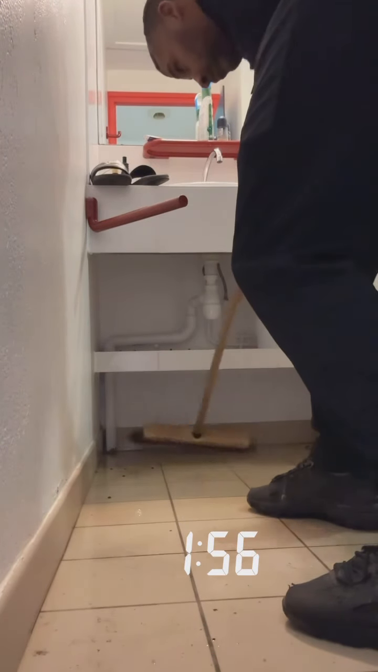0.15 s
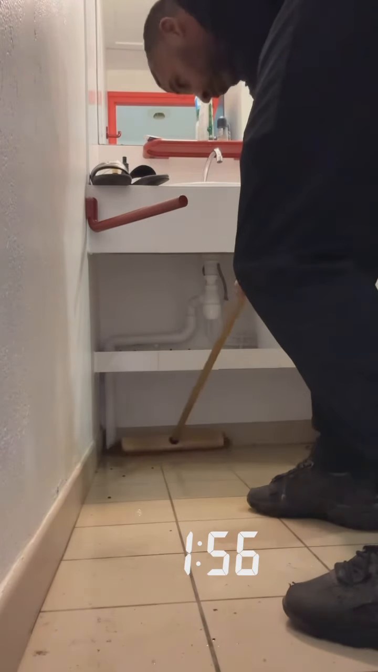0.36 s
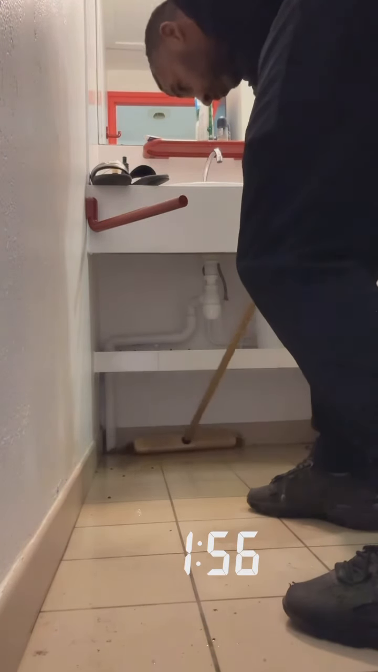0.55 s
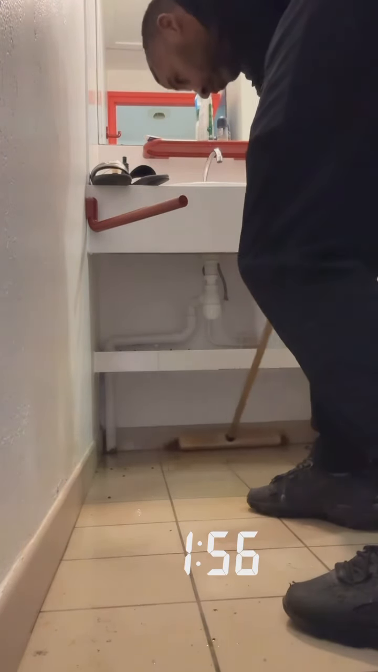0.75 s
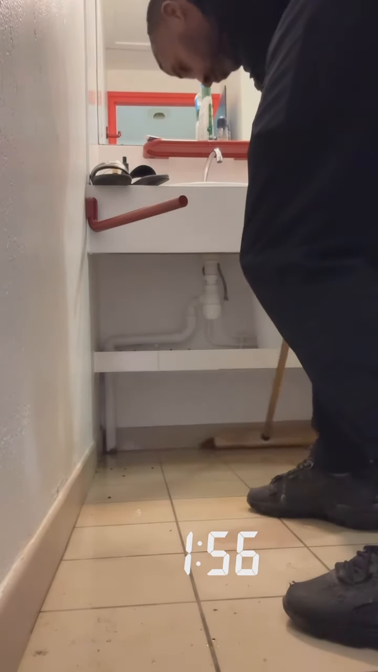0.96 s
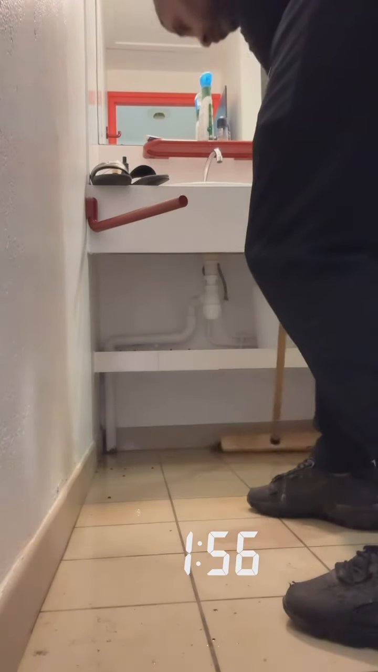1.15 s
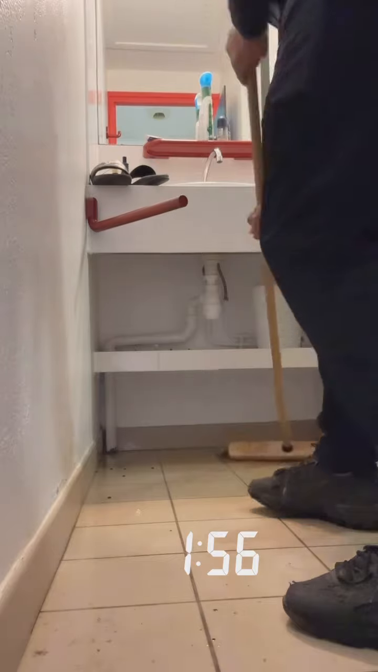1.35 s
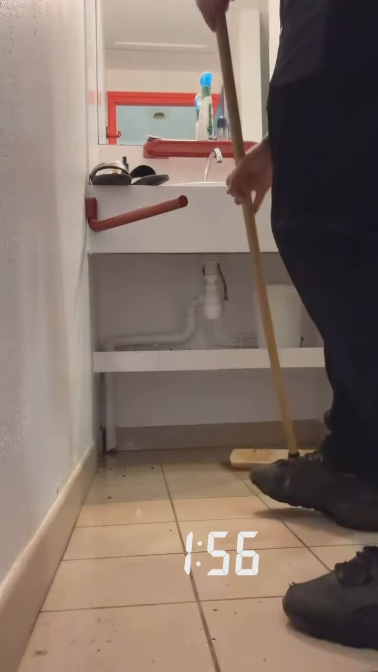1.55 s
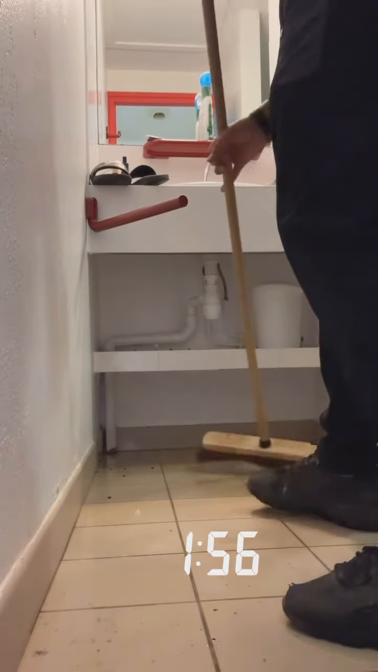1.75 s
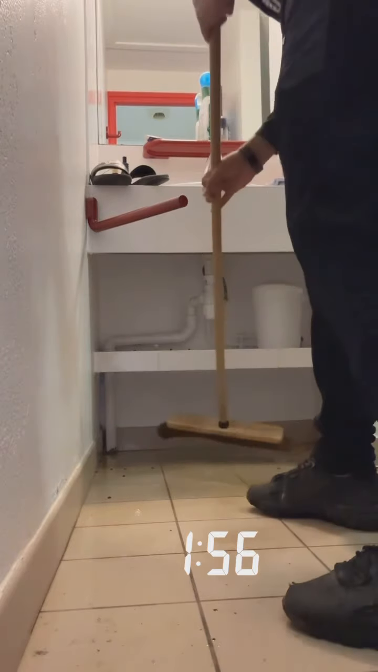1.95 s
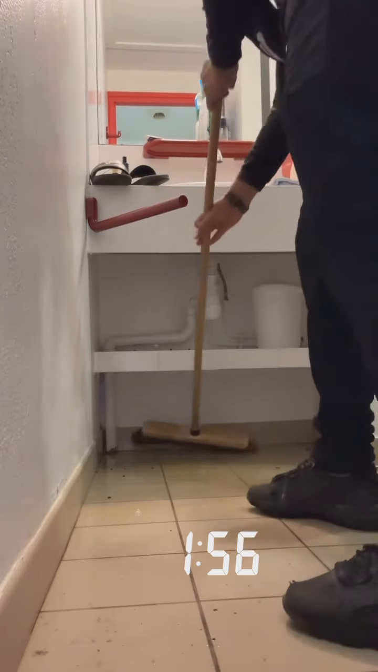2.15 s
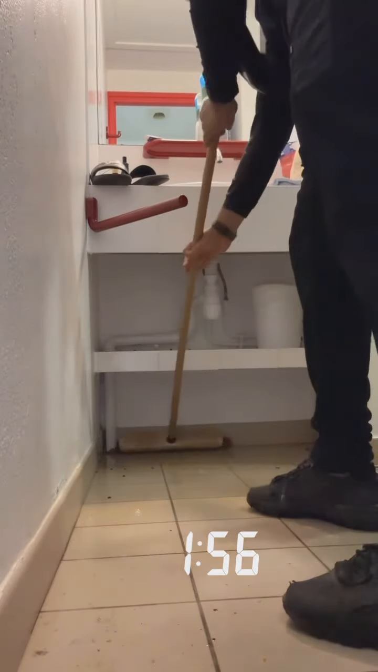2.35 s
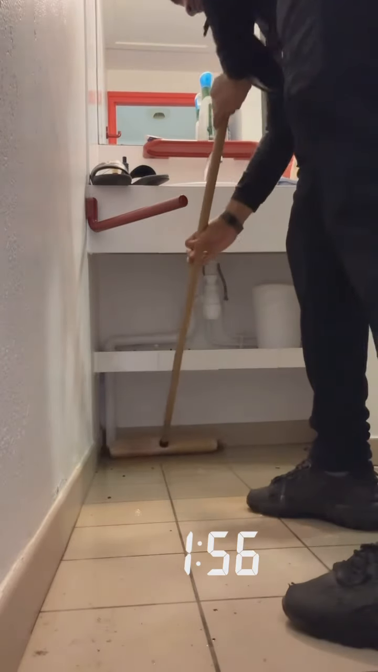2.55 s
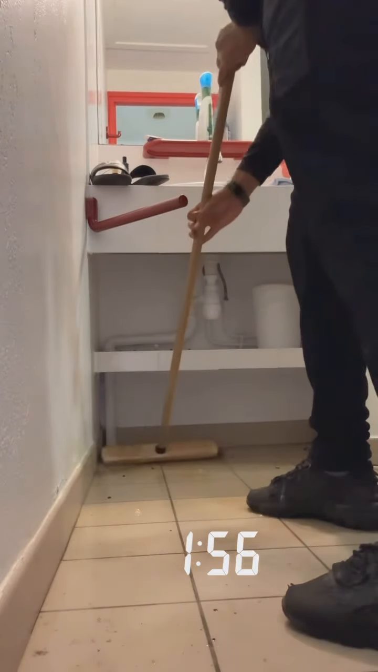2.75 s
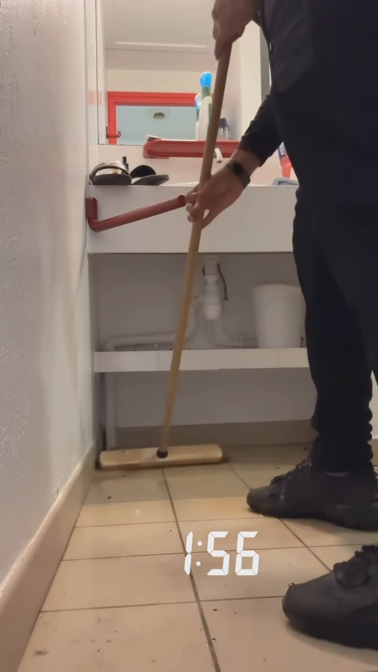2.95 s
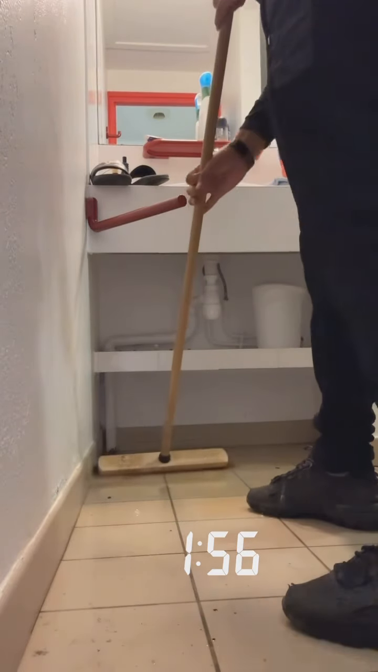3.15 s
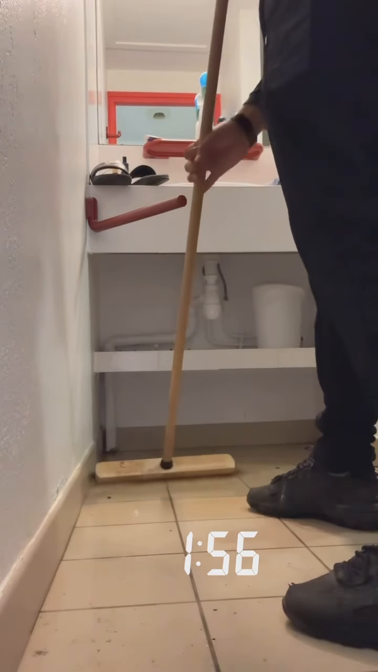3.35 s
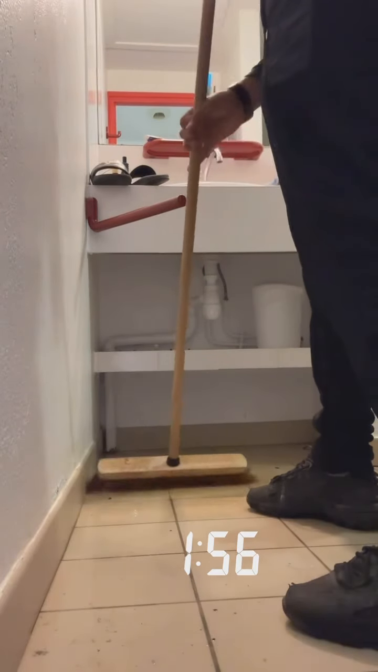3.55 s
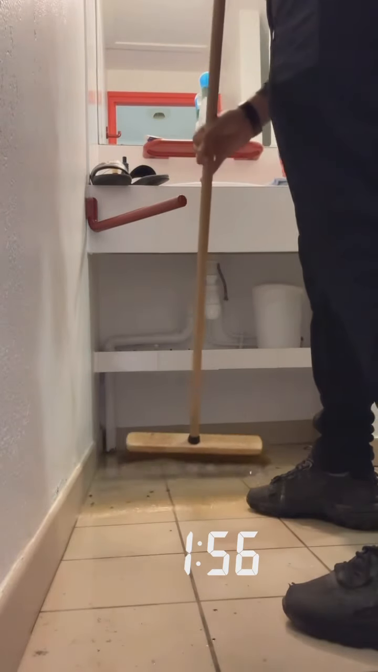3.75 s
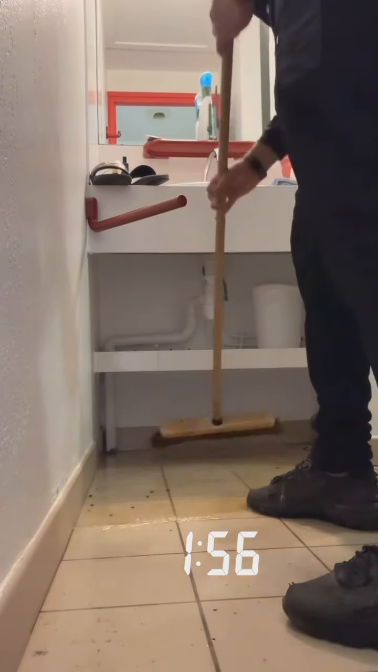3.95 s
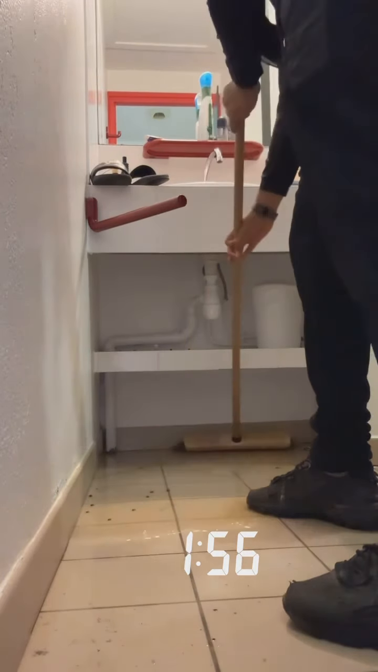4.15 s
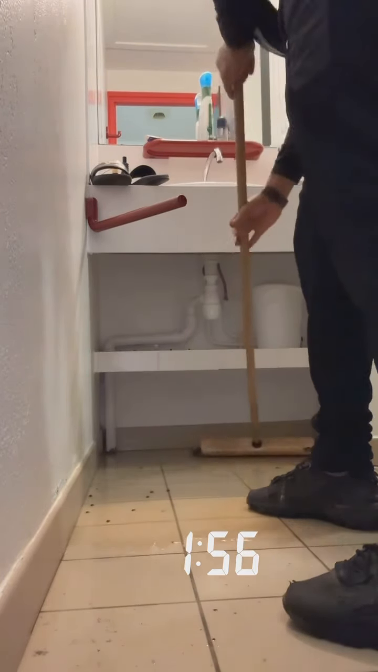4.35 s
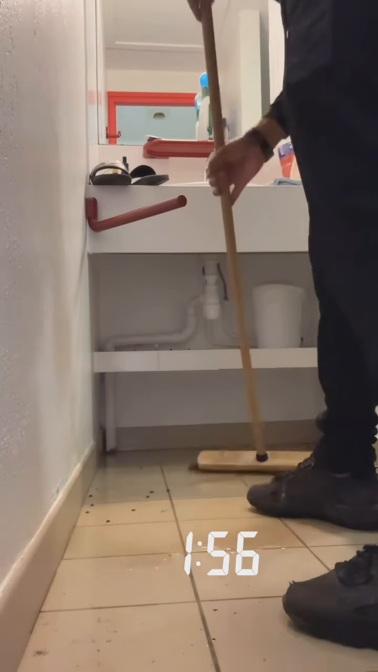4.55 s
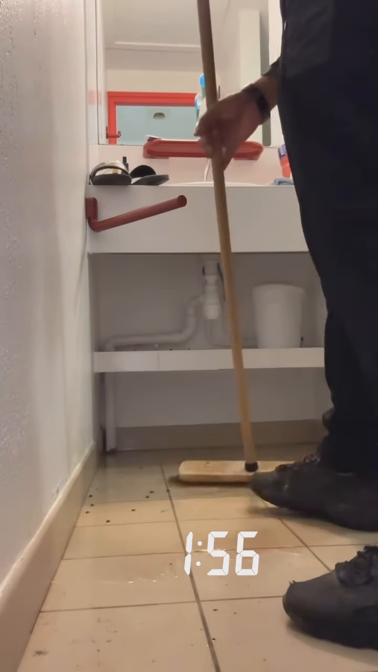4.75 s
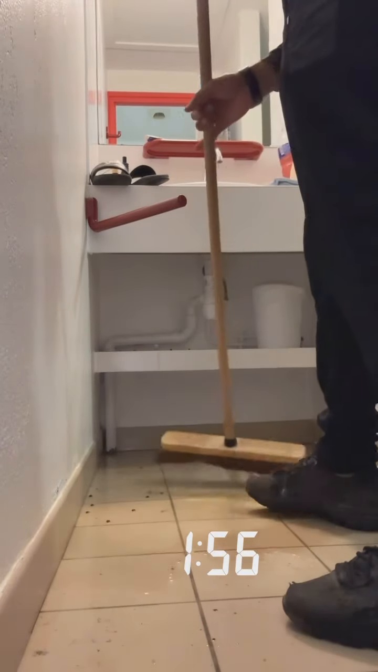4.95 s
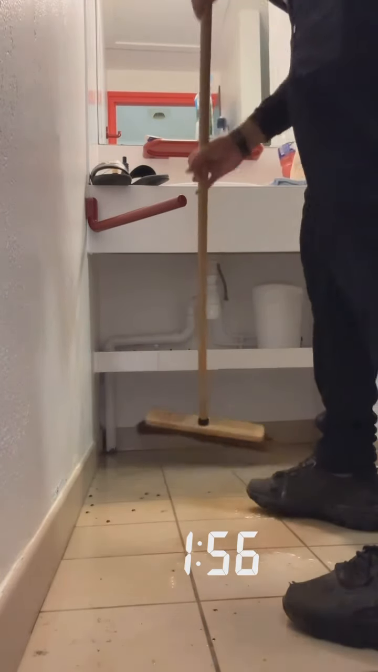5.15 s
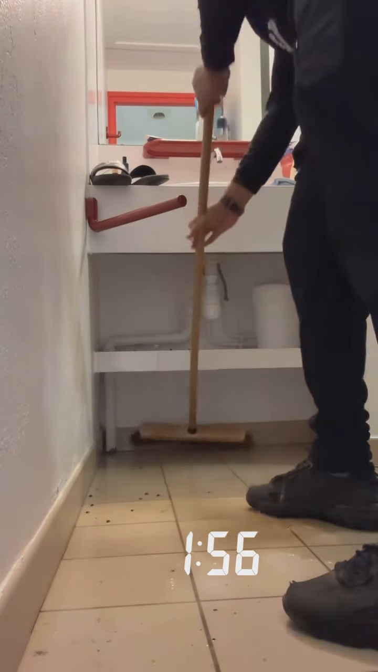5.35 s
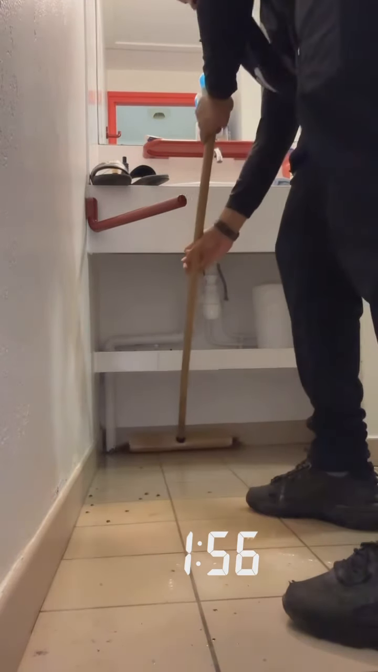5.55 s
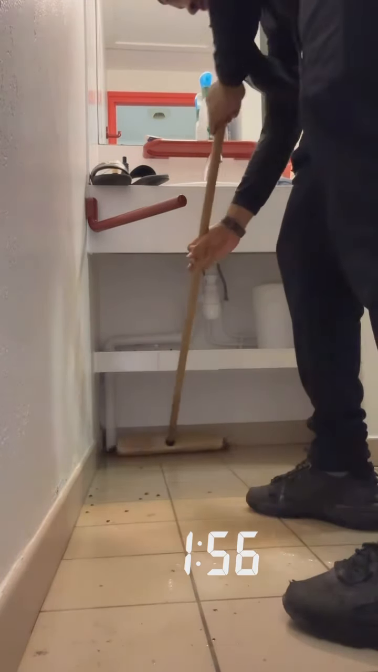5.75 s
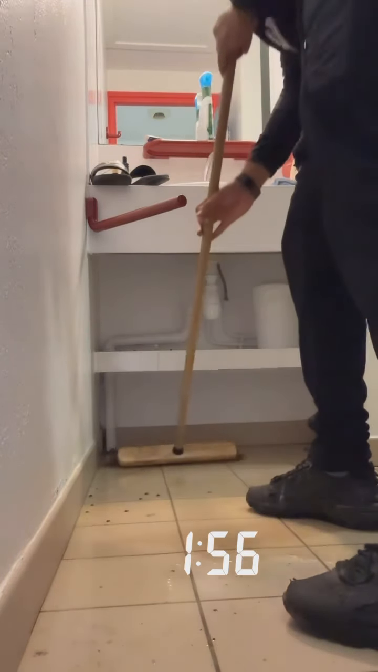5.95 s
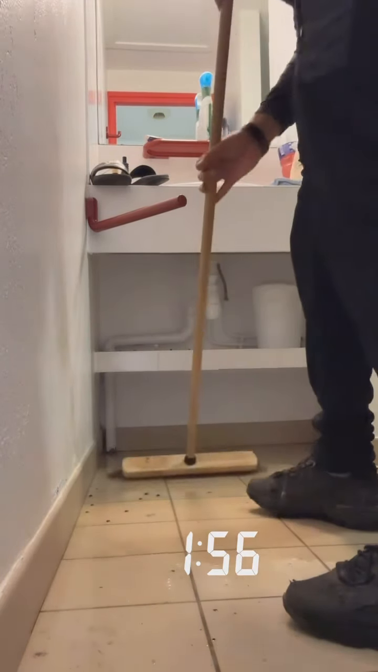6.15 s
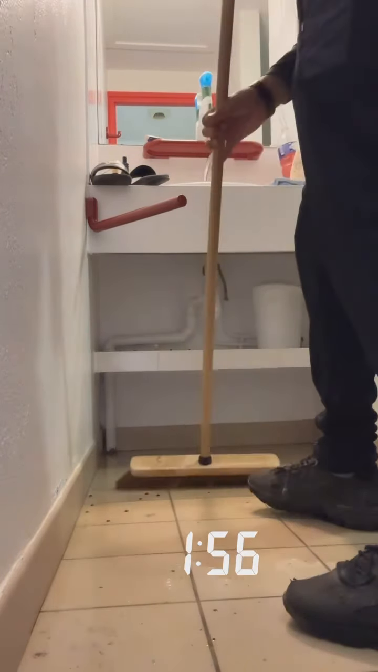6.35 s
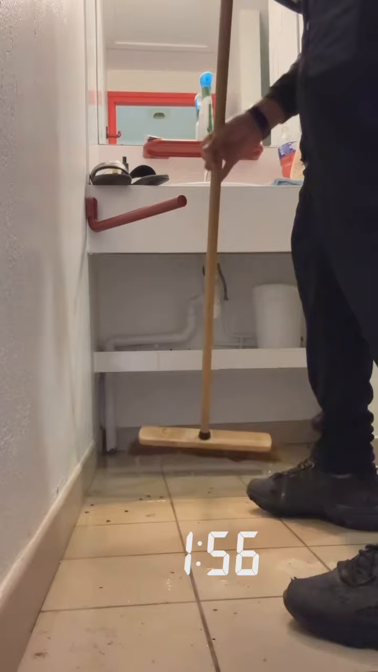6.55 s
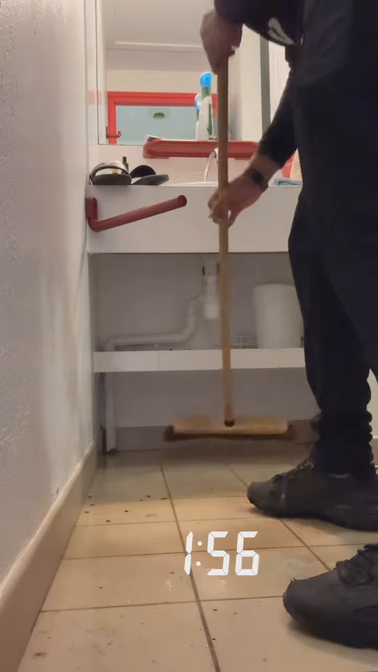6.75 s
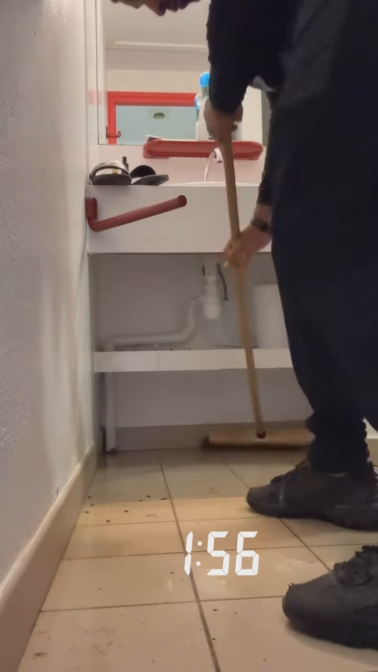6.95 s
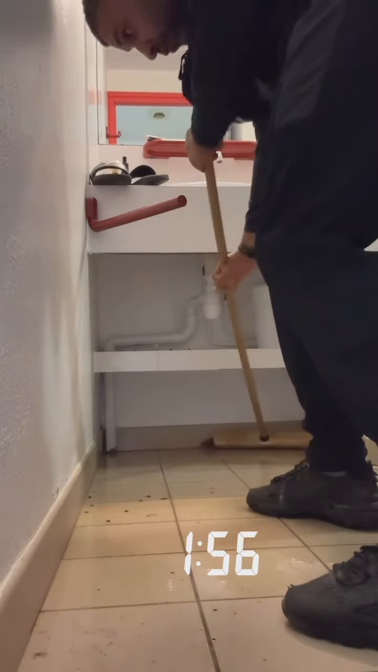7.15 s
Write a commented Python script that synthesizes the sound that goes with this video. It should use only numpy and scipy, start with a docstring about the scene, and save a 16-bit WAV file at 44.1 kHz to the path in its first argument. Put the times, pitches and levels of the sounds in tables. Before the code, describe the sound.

Close up in a small, hard-walled tiled bathroom, a wooden push broom sweeps damp grit in uneven scratchy passes, each swelling and fading. Near one second the head clatters hard; another sharp knock comes around four and a half seconds, after a cluster of bristle slaps and a brief low groan. Later strokes alternate strong and light. Soft ventilation air and a wavering low hum stay underneath.

```python
"""In a small tiled bathroom, a wooden push broom is drawn over a damp, gritty floor.
Bristles slap down in bursts of tiny clicks, then hiss, rasp and shudder as they slip over the grit.
The wooden head knocks hard twice; dull thumps, bristle squeaks and a short sinking groan join in.
Each pass swells and fades with the speed of the broom, and the walls ring after every broom sound.
A soft rush of ventilation air and a wavering hum lie underneath; both channels are the same."""
import sys
import numpy as np
from scipy import signal
from scipy.fft import rfft, irfft
from scipy.io import wavfile
from scipy.ndimage import uniform_filter1d

SR = 44100
rng = np.random.default_rng(int(sys.argv[2]) if len(sys.argv) > 2 else 0)


def wrap_up_sound(samples):
    """Save the sound to the file named by the first command line argument, as 16-bit audio."""
    columns = np.atleast_2d(samples).T
    # keep every value between -1 and 1, then stretch to whole-number steps
    tamed = np.clip(columns, -1, 1)
    steps = np.round(tamed * 32767).astype(np.int16)
    wavfile.write(sys.argv[1], SR, steps)


N = 317961  # length in samples
HZ = np.fft.rfftfreq(4096, 1 / SR)  # frequencies at which every colour is worked out


def amp(db):
    """Turns decibels into a plain multiplier."""
    return 10 ** (np.asarray(db) / 20)


def evened(x):
    """Scales a sound to an rms of 1."""
    return x / np.sqrt(np.mean(x ** 2) + 1e-20)


def read(points, hz):
    """Reads a curve joined by straight lines on a log-frequency axis."""
    point_hz, value = np.transpose(points)
    return np.interp(np.log(hz + 1), np.log(point_hz), value)


def add(mix, start_s, sound):
    """Adds a sound to the mix at its start time, cut off at the end of the mix."""
    part = mix[round(start_s * SR):][:len(sound)]
    part += sound[:len(part)]


def causal_response(log_gain):
    """Finds the response with this gain that never sounds before its cause."""
    mirrored = np.r_[log_gain, log_gain[-2:0:-1]]
    return np.exp(np.conj(signal.hilbert(mirrored)))[:len(log_gain)]


def colour(x, gain):
    """Filters a sound with the given gain at the frequencies HZ."""
    ring = irfft(causal_response(np.log(np.maximum(gain, 1e-5))))
    return signal.oaconvolve(x, ring)[:len(x)]


def balanced(x, span_hz):
    """Gives a random burst equal energy in every band of this width, keeping its finer ripple."""
    spectrum = rfft(x, 2 * len(x))
    bins = max(3, int(span_hz * 2 * len(x) / SR))
    power = uniform_filter1d(abs(spectrum) ** 2, bins)
    log_gain = -0.5 * np.log(np.maximum(power, 0) + 1e-12)
    return irfft(spectrum * causal_response(log_gain))[:len(x)]


def drift(rate_hz):
    """Makes a random wandering of rms 1, with no changes faster than the given rate."""
    slow = np.fft.rfftfreq(N, 1 / SR) < rate_hz
    return evened(irfft(rfft(rng.standard_normal(N)) * slow, N))


def slips(per_s, spread_db):
    """Makes a random train of tiny clicks, a few far larger than the rest."""
    size = amp(spread_db * np.minimum(rng.exponential(1, N), 4))
    happens = rng.random(N) < per_s / SR
    return evened(size * rng.choice([-1, 1], N) * happens)


def resonance(ring_hz, boost_db, q):
    """Gives the gain of one peak (or dip, if negative) in a flat spectrum; higher q is narrower."""
    offset = 2 * q * (HZ - ring_hz) / ring_hz
    return np.sqrt(1 + (amp(boost_db) ** 2 - 1) / (1 + offset ** 2))


def contact(spread_s, gain, level_db, rise):
    """Two surfaces meet: a coloured cluster of small clicks builds up and dies away."""
    t = np.arange(8192) / SR
    shape = np.exp(-t / spread_s) * (1 - np.exp(-t / (rise * spread_s)))
    clicks = rng.uniform(-1.06, 1, len(t)) * (rng.random(len(t)) < 0.4)
    sound = colour(balanced(clicks * shape, span_hz=300), gain)
    # The level is the rms when all the energy is spread over a tenth of a second.
    return amp(level_db) * sound / (np.linalg.norm(sound) + 1e-12) * np.sqrt(SR / 10)


# Colour of the air noise: pitch_hz [Hz], relative_level_db [dB]
AIR_COLOUR = [(20, -13), (45, -8), (72, 3.5), (115, -2.5), (180, -0.5), (300, 0), (550, -5), (900, -5),
              (3000, -16.5), (6500, -19.5), (9500, -31), (15000, -32)]
# Hum level before its waver: time_s [s], level_db [dB]
HUM_LEVELS = [(0, -55), (.35, -56), (.68, -46.5), (.83, -66), (1.3, -54.5), (4.1, -54.5), (4.42, -44),
              (4.801, -56.5), (5.65, -60), (6.33, -49.5), (6.55, -62.5), (6.9, -51.5)]


def ventilation(air_db=-51.5, hum_hz=180, hum_waver_db=2):
    """Air rushes as soft coloured noise; the hum is one tone that wavers in pitch and level."""
    air = evened(colour(rng.standard_normal(N), amp(read(AIR_COLOUR, HZ))))
    turns = np.cumsum(hum_hz + 2.9 * drift(11.1)) / SR
    hum = evened(np.sin(2 * np.pi * turns))
    hum_db = np.interp(np.arange(N) / SR, *np.transpose(HUM_LEVELS)) + hum_waver_db * drift(10)
    return amp(air_db) * air + amp(hum_db) * hum


def swing(full_s, rise_s, hold_s, fall_s, fade_db=-9.5, arch=2.08):
    """The broom gathers speed, keeps it and slows; fade_db is reached after one rise or fall time."""
    t = np.arange(N) / SR - full_s
    away = np.maximum(-t / rise_s, 0) + np.maximum((t - hold_s) / fall_s, 0)
    return amp(fade_db * np.minimum(away, 10) ** arch)  # arch sets how rounded the swing is


# Colours of the hiss of bristle tips, the rasp of bent bristles, the shudder of the head, and
# the fizz of tiny bubbles bursting on damp tile: pitch_hz [Hz], relative_level_db [dB per Hz]
HISS_COLOUR = [(300, -26), (700, -20), (1300, -17), (2200, -5), (3100, 0.5), (5000, 1.5), (6600, 1),
               (7700, -5.5), (9200, -20), (10500, -28), (15000, -23.5)]
RASP_COLOUR = [(300, -26), (650, -17.5), (1000, -5.5), (1400, -4), (1900, 1), (2400, -2), (3200, -8.5),
               (6000, -44.5)]
SHUDDER_COLOUR = [(40, -35), (80, -13.5), (125, -4), (240, -7.5), (430, -1), (750, -5.5), (1100, -20),
                  (2500, -41)]
FIZZ_COLOUR = [(6000, -28), (9500, -11), (12000, 0), (15000, 0)]
# Passes of the broom, firm strokes and light returns; levels before uneven floor and room:
# full_speed_s [s], rise_s [s], hold_s [s], fall_s [s],
# hiss_db [dB], rasp_db [dB], shudder_db [dB], fizz_db [dB]
STROKES = [(0.0, .05, 0, 0.033, -38, -47.5, -54, -66), (0.133, .1, 0.025, 0.23, -39, -44, -52, -62),
           (0.566, 0.14, 0, 0.52, -34, -39.5, -74, -55), (1.244, 0.27, 0, 0.33, -33, -36.5, -47, -55.5),
           (1.84, 0.14, 0, 0.16, -46.5, -52, -59, -61), (2.19, 0.15, 0.066, 0.11, -41.5, -51.5, -73, -67),
           (2.442, 0.086, 0.13, 0.1, -36.5, -41, -49, -69),
           (2.697, 0.17, 0.48, 0.17, -42.5, -39.5, -65, -74),
           (3.253, .06, 0.12, 0.16, -44, -40.5, -43, -64), (3.702, 0.15, 0, 0.67, -46.5, -52, -58, -62),
           (4.24, 0.087, 0, 0.44, -32, -40.5, -56, -54), (5.116, 0.13, 0.45, .2, -48.5, -53, -79, -69),
           (5.785, .17, 0.085, 0.36, -33.5, -42, -52.5, -64), (6.526, 0.17, 1, 0.17, -49, -54, -57, -67),
           (7.19, 0.11, 0, .2, -45, -48, -52.5, -49.5)]


def sweeping(handling_db=-62.5):
    """Tips slip over grit and fizz on the damp; dragged bristles rasp and their stick-slip shakes the head."""
    swings = np.array([swing(*row[:4]) for row in STROKES])
    levels = amp(np.array(STROKES)[:, 4:].T)
    sliding, dragging, binding, wetness = np.sqrt(levels ** 2 @ swings ** 2)
    grip = amp(0.47 * drift(34))  # the tiles are unevenly rough
    puddles = amp(3.2 * drift(11))  # and unevenly damp
    hiss = evened(colour(slips(7000, spread_db=2.5), amp(read(HISS_COLOUR, HZ)))) * sliding
    rasp = evened(colour(slips(2500, spread_db=2.0), amp(read(RASP_COLOUR, HZ)))) * dragging
    fizz = evened(colour(slips(900, spread_db=3.5), amp(read(FIZZ_COLOUR, HZ)))) * wetness
    shaking = np.hypot(binding, amp(handling_db))  # a little remains while the broom is merely carried
    shudder = evened(colour(slips(500, spread_db=4.0), amp(read(SHUDDER_COLOUR, HZ)))) * shaking
    return grip * (hiss + rasp) + puddles * fizz + shudder


# Colour of a bristle slap, used for squeaks too: pitch_hz [Hz], relative_level_db [dB]
SLAP_COLOUR = [(200, -1.5), (1200, -1), (3000, 0.5), (6600, 1), (7800, -4.5), (9800, -22), (12000, -27),
               (15000, -23)]
# Bristles landing, levels before the room: start_s [s], level_db [dB], spread_s [s],
# lower_edge_hz [Hz], ring_hz [Hz], ring_boost_db [dB], top_fizz_db [dB]
SLAPS = [(0.1686, -31.5, 0.01, 2030, 3350, 7, 0), (2.09, -38.5, 0.0084, 2700, 2800, 8.5, 11),
         (2.241, -40.5, 0.015, 1400, 3100, 4, 7), (4.036, -43, 0.0094, 2500, 4500, 0, 11),
         (4.052, -33, 0.0059, 1300, 1700, 13, 10), (4.069, -26.5, 0.014, 845, 1220, 14.5, 7),
         (4.085, -28.5, 0.0053, 1200, 4100, 7.5, 8), (5.338, -41.5, .014, 3500, 6000, 12, 4),
         (5.352, -39.5, .004, 1400, 1740, 9, 11), (5.36, -31.5, .01, 1400, 1870, 9.5, 6),
         (5.388, -33.5, 0.011, 950, 1300, 10, -8), (6.525, -43.5, 0.022, 1800, 3940, 4, 7),
         (6.926, -31, 0.011, 2200, 4580, 7.5, 7), (6.958, -39, 0.014, 1000, 1270, 12.5, -3),
         (7.015, -38, .016, 2800, 4060, 9, 5)]


def slaps(body_db=-13, ring_q=13):
    """Many bristles land almost together; flat, wet landings reach lower, ring and fizz."""
    out = np.zeros(N)
    for start_s, level_db, spread_s, low_hz, ring_hz, boost_db, fizz_db in SLAPS:
        edge = 1 - (1 - amp(body_db)) / (1 + (HZ / low_hz) ** 6)  # body_db is what stays below the edge
        fizz = amp(fizz_db * np.clip((HZ - 8200) / 4000, 0, 1))
        gain = amp(read(SLAP_COLOUR, HZ)) * edge * fizz * resonance(ring_hz, boost_db, ring_q)
        add(out, start_s, contact(spread_s, gain, level_db, rise=0.92))
    return out


# Broad colour of the wooden head: pitch_hz [Hz], relative_level_db [dB]
WOOD_COLOUR = [(40, -13), (78, -18), (120, -17.5), (230, -2), (400, -6.5), (600, 0), (800, -1.5), (2000, 5),
               (3600, -1.5), (6000, 7), (7500, -2.5), (9500, -24), (15000, -37)]
# Ringing modes of head and handle: pitch_hz [Hz], width_hz [Hz], boost_db over the broad colour [dB]
WOOD_MODES = [(272, 11, 8.5), (460.4, 19, 11), (764, 22, 7.5), (1050, 67, 0), (1310, 400, 1.5),
              (1590, 70, 0), (1870, 38, 5), (2160, 24, -9), (2925, 86, 7.5), (4160, 76, 9.5)]
# Blows on the head, levels before the room: start_s [s], level_db [dB],
# hardness as upper_edge_hz [Hz], rattle_s [s], ring_hz [Hz], ring_boost_db [dB]
KNOCKS = [(0.9146, -19.5, 1950, 0.0022, 905, 10), (0.918, -24.5, 5030, 0.0018, 1600, 8.5),
          (0.926, -21, 2700, 0.0057, 2300, 7), (0.937, -17.5, 1960, 0.017, 1050, 7.5),
          (0.966, -26, 2000, 0.0082, 1710, 8), (0.982, -30.5, 900, 0.0066, 264, 15.5),
          (1.668, -38.5, 746, 0.028, 420, 7.5), (2.259, -41.5, 3000, .007, 600, 1),
          (3.215, -46.5, 686, 0.018, 332, 12), (3.31, -43, 694, 0.031, 270, 3),
          (3.466, -39.5, 650, 0.0077, 264, 15), (4.541, -41.5, 420, .011, 300, 9),
          (4.5725, -25, 4400, 0.00019, 3300, 16), (4.573, -28, 1230, 0.0093, 240, 10.5),
          (4.5813, -31.5, 3200, 0.0014, 2000, 9), (4.592, -30.5, 755, 0.011, 443, 15),
          (4.883, -43.5, 1090, .015, 540, 12), (5.372, -40.5, 1800, 0.0047, 500, 5),
          (6.246, -47.5, 647, .02, 390, 11), (6.388, -46, 1000, 0.018, 623, 4.5)]


def knocks(soft_db=-20):
    """The head strikes and rattles on its handle; harder contact reaches higher."""
    out = np.zeros(N)
    modes = [resonance(pitch_hz, db, pitch_hz / width_hz) for pitch_hz, width_hz, db in WOOD_MODES]
    body = amp(read(WOOD_COLOUR, HZ)) * np.prod(modes, axis=0)
    for start_s, level_db, hard_hz, rattle_s, ring_hz, boost_db in KNOCKS:
        edge = 1 / np.sqrt(1 + (HZ / hard_hz) ** 8)
        edge += amp(soft_db) * hard_hz / 2200  # grit adds a faint click
        gain = body * edge * resonance(ring_hz, boost_db, q=8.1)
        add(out, start_s, contact(rattle_s, gain, level_db, rise=0.65))
    return out


# Dull thumps through the floor, levels before the room: start_s [s], level_db [dB]
THUMPS = [(0.94, -45.5), (2.44, -56), (5.779, -51.5)]


def thumps(boom_hz=78.6, spread_s=0.004, q=2.5):
    """Weight comes down on the floor with a short, low boom."""
    out = np.zeros(N)
    ratio = HZ / boom_hz
    gain = ratio ** 2 / (1 + (2 * q * (ratio - 1)) ** 2) / (1 + (HZ / 160) ** 4)
    for start_s, level_db in THUMPS:
        add(out, start_s, contact(spread_s, gain, level_db, rise=0.29))
    return out


# Damp bristles flicking free, levels before the room: start_s [s], level_db [dB], pitch_hz [Hz]
SQUEAKS = [(1.773, -44, 6230), (3.745, -44.5, 5470), (3.815, -50, 4800), (4.813, -55, 4970)]


def squeaks(spread_s=0.017, ring_db=13, lower_edge_hz=4700):
    """A few bristles chatter around one high pitch as they leave the tile."""
    out = np.zeros(N)
    thin = amp(read(SLAP_COLOUR, HZ)) * (1 - 1 / (1 + (HZ / lower_edge_hz) ** 2))
    for start_s, level_db, pitch_hz in SQUEAKS:
        gain = thin * resonance(pitch_hz, ring_db, q=13)
        add(out, start_s, contact(spread_s, gain, level_db, rise=0.84))
    return out


# One stick-slip groan; pitch before its waver, level before the room:
# time_s [s], pitch_hz [Hz], level_db [dB]
GROAN_PATH = [(4.21, 425.4, -57), (4.25, 420.5, -43), (4.297, 379.5, -40), (4.35, 360, -59),
              (4.42, 340, -68)]


def groan(overtone_db=-15):
    """Slips fall briefly into step and give a rough, sinking tone."""
    time_s, pitch_hz, level_db = np.transpose(GROAN_PATH)
    t = np.arange(N) / SR
    wavering_hz = np.interp(t, time_s, pitch_hz) * (1 + 0.034 * drift(91.4))
    phase = 2 * np.pi * np.cumsum(wavering_hz) / SR
    tone = np.sin(phase) + amp(overtone_db) * (np.sin(2 * phase) + np.sin(3 * phase))
    return evened(tone) * np.interp(t, time_s, amp(level_db), left=0, right=0)


# Time for the echoes to fall by 60 dB: pitch_hz [Hz], fall_s [s]
ECHO_FALL = [(80, 0.67), (300, 0.39), (1000, 0.57), (2500, 0.31), (6000, 0.29), (15000, 0.37)]


def tail(level_db):
    """Echoes of random sign crowd together over time; each pitch dies at its own rate."""
    t = np.arange(SR) / SR
    density = np.clip(t / 0.05, 0, 1) * 0.3 * (t > 0.002)
    taps = rng.choice([-1, 1], SR) * (rng.random(SR) < density) / np.sqrt(density + 0.0068)
    band_hz, frame_s, bands = signal.stft(taps, SR, nperseg=256)
    fading = amp(-60 * frame_s / read(ECHO_FALL, band_hz)[:, None])
    echoes = signal.istft(bands * fading, SR, nperseg=256)[1][:SR]
    echoes = balanced(echoes, span_hz=245)
    return amp(level_db) * echoes / np.linalg.norm(echoes)


# Standing waves between the walls: pitch_hz [Hz], level_db [dB], time to fall by 60 dB fall_s [s]
STANDING_WAVES = [(76, -38, 0.84), (282, -46, 1), (445.8, -31, 0.76), (758, -35.5, 1)]


def bathroom(x, direct_db=-3.0, tail_db=-2.0):
    """Walls add standing waves, and reflections that change as the contact shifts along the broom."""
    t = np.arange(SR) / SR
    steady = amp(direct_db) * (t == 0)
    for pitch_hz, level_db, fall_s in STANDING_WAVES:
        wave = np.cos(2 * np.pi * pitch_hz * t) * amp(-60 * t / fall_s)
        steady += amp(level_db) * wave / np.linalg.norm(wave)
    out = signal.oaconvolve(x, steady)[:N]
    place = 2 * np.pi * 11 * np.arange(N) / SR  # cycles 11 times a second
    for k in range(3):
        share = np.sqrt(2 / 3) * np.cos(place + k * np.pi / 3)  # the squared shares always add to 1
        out += signal.oaconvolve(x * share, tail(tail_db))[:N]
    return out


def scene():
    """Broom sounds ring in the room, ventilation joins, and both channels get the same sound."""
    broom = sweeping() + slaps() + knocks() + thumps() + squeaks() + groan()
    mono = bathroom(broom) + ventilation()
    return np.array([mono, mono])


def record(dry, edge_hz=15850):
    """Peaks round off at full scale; then the highest treble is cut."""
    held = dry / (1 + dry ** 6) ** (1 / 6)
    low_pass = signal.firwin(511, edge_hz, window=("kaiser", 9), fs=SR)
    return signal.oaconvolve(held, low_pass[None], "same")


dry = scene()
out = record(dry)
wrap_up_sound(out)
```